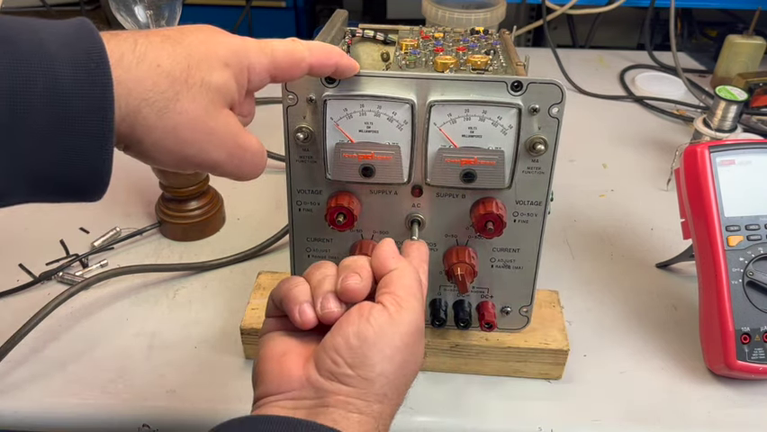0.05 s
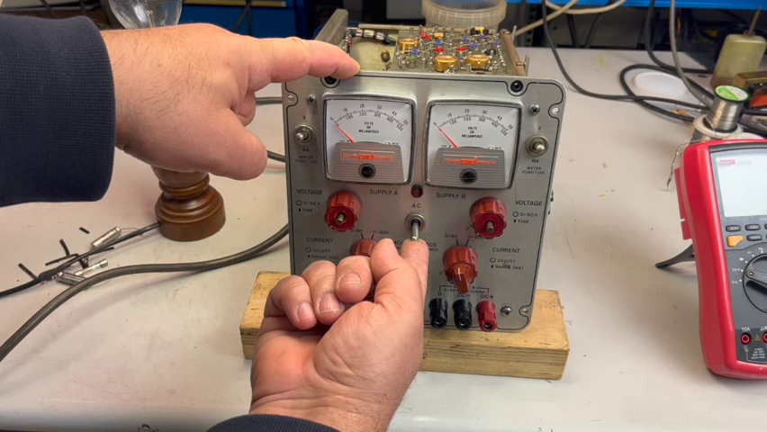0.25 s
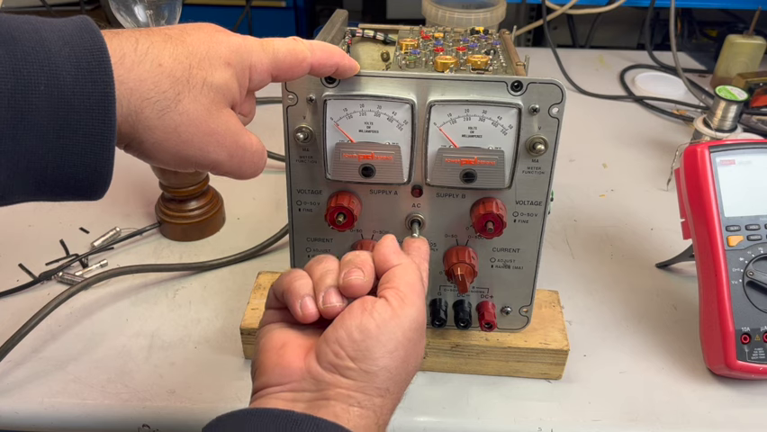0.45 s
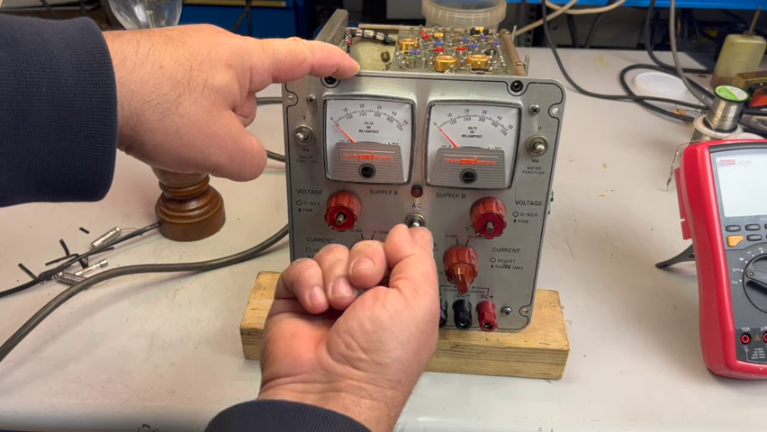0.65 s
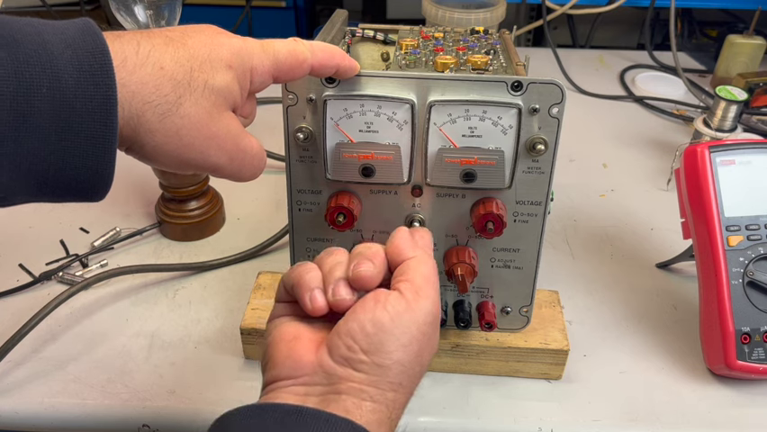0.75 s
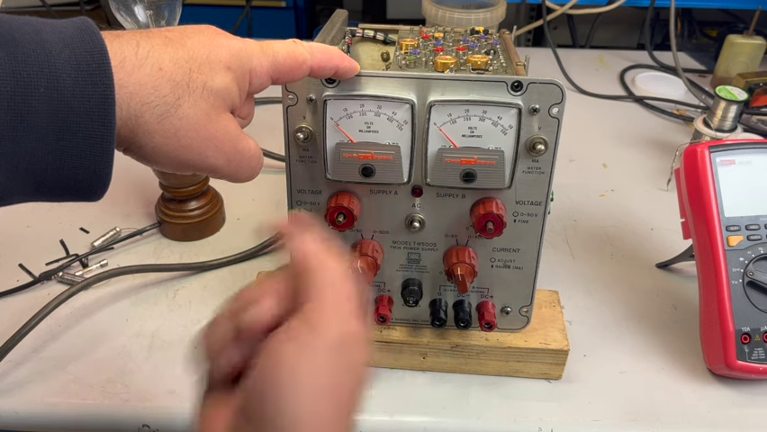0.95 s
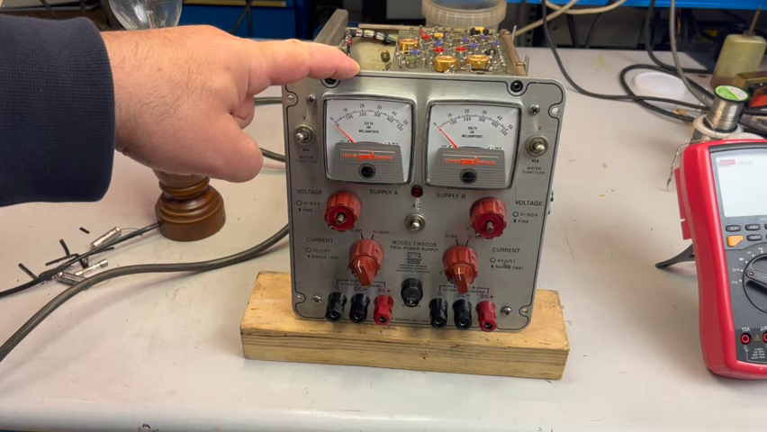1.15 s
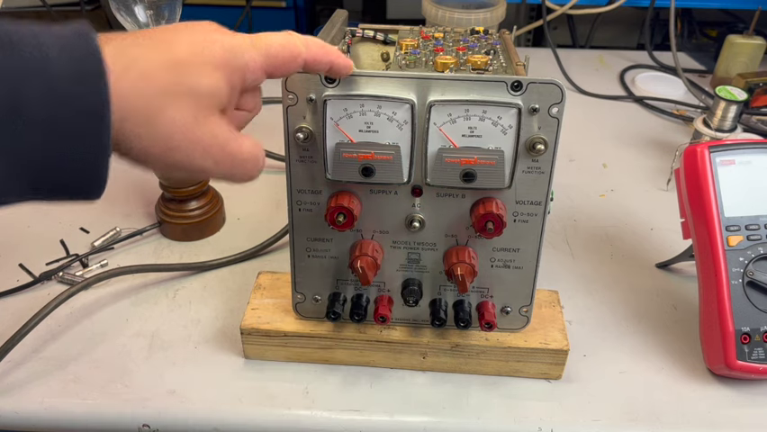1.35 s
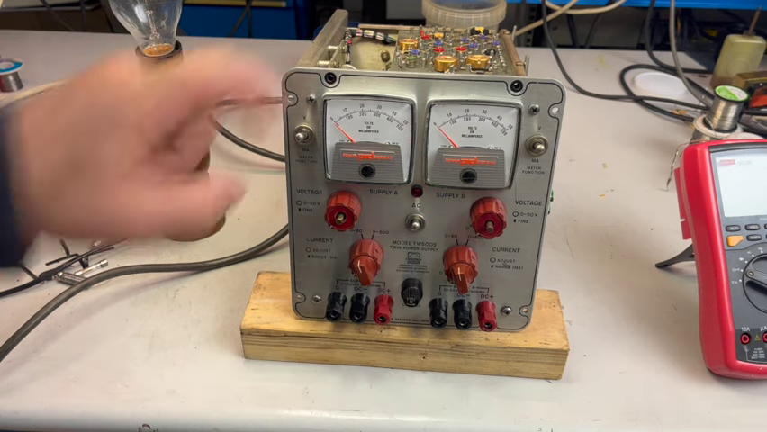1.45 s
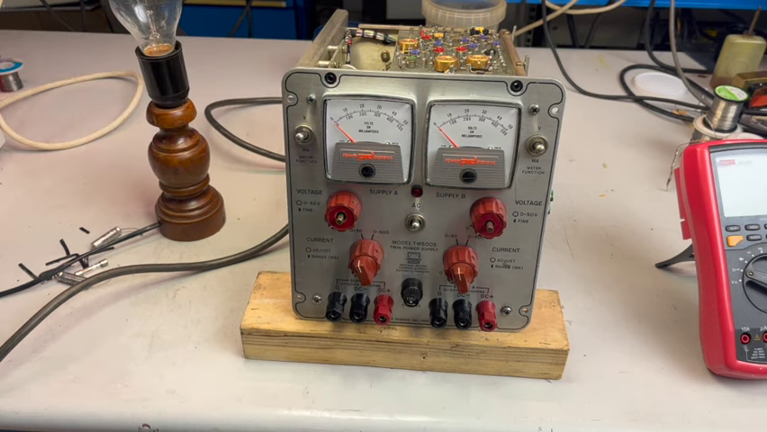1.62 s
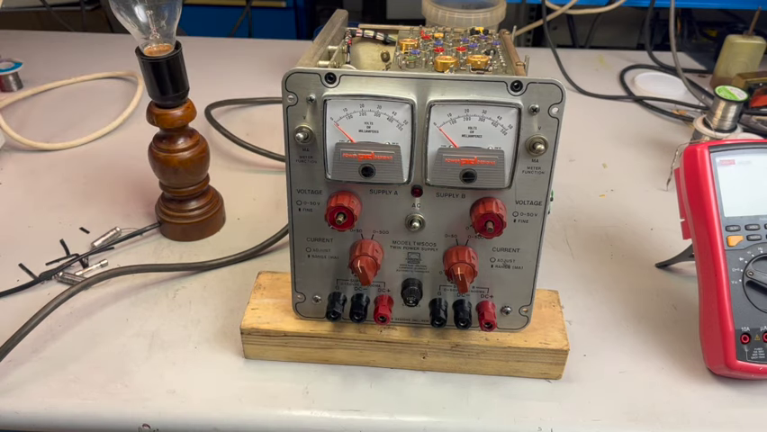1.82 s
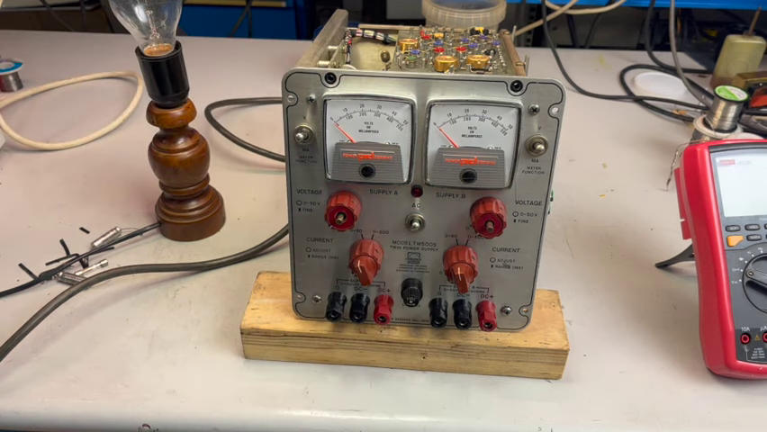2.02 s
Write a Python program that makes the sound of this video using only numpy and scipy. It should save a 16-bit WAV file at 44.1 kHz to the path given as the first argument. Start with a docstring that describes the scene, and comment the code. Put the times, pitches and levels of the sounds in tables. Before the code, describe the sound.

A toggle switch is flipped on a bench power supply, giving one sharp, close click with a brief metallic ring. Afterwards sleeves rustle very faintly and a hand brushes off the case, over a small workshop's low rumble.

```python
"""A small workshop, close to a bench power supply: a toggle switch is flipped on its metal front.
A fingertip ticks on the lever, the lever rubs, the spring snaps over and the contact hits its stop.
Each hit cracks and rings the panel and case; the room answers and the chassis shudders on its block.
Afterwards sleeves rustle faintly and a hand brushes off the case, over the low rumble of the room."""
import sys
import numpy as np
from scipy import signal
from scipy.fft import rfft, irfft, next_fast_len
from scipy.io import wavfile
from scipy.ndimage import uniform_filter1d, map_coordinates

SR = 44100
rng = np.random.default_rng(int(sys.argv[2]) if len(sys.argv) > 2 else 0)


def store_pcm(level_fs):
    """Save levels as 16-bit WAV."""
    pcm = np.round(np.clip(level_fs, -1, 1) * 32767).astype(np.int16)
    wavfile.write(sys.argv[1], SR, np.atleast_2d(pcm).T)


N = 91595
TIME = np.arange(N) / SR
FFT_SIZE = next_fast_len(N + 8192)
ATTACK_S = .0001


def amp(db):
    """Decibels to gain."""
    return 10 ** (np.asarray(db) / 20)


def unit(x):
    """Scale to rms 1."""
    return x / np.sqrt(np.mean(x ** 2) + 1e-20)


def along(curve, hz):
    """Read a breakpoint curve on a log frequency axis."""
    freqs, values = np.transpose(curve)
    return np.interp(np.log(hz + 1), np.log(freqs + 1), values)


def filtered(x, response):
    """EQ x with a gain given as a function of frequency."""
    hz = np.fft.rfftfreq(FFT_SIZE, 1 / SR)
    return irfft(rfft(x, FFT_SIZE) * response(hz), FFT_SIZE)[..., :N]


def causal(gain):
    """Minimum-phase EQ: no pre-ring ahead of a hit."""
    cepstrum = irfft(np.log(np.maximum(gain, 1e-6)))
    n = np.arange(len(cepstrum))
    return np.exp(rfft(cepstrum * np.where(n == 0, 1, 2 * (n < len(n) // 2))))


def since(start):
    """Seconds since start, zero before."""
    return np.maximum(TIME - start, 0)


def fade(t, t60, rise):
    """Attack and exponential decay."""
    return (1 - np.exp(-t / rise)) * np.exp(-np.log(1000) * t / t60)


def tilt(hz, slope_db):
    """Tilt EQ in dB per octave around 3 kHz, flat below 1 kHz."""
    return amp(slope_db * np.log2(np.maximum(hz, 1000) / 3000))


def noise(spectrum, correlation, slope_db=0):
    """Coloured stereo noise of rms 1; high left-right correlation narrows the image."""
    def colour(hz):
        width = np.arccos(np.clip(along(correlation, hz), -1, 1)) / 2
        return amp(along(spectrum, hz)) * tilt(hz, slope_db) * [np.cos(width), np.sin(width)]
    mid, side = filtered(rng.standard_normal((2, N)), colour)
    return unit(np.array([mid + side, mid - side]))


def ring(modes, t, slope_db=0, spread_rad=.35):
    """Damped modes, each a little out of phase between left and right."""
    phases = spread_rad * rng.standard_normal((len(modes), 2, 1))
    return sum(amp(db) * tilt(hz, slope_db) * fade(t, t60, ATTACK_S) * np.sin(2 * np.pi * hz * t + phase)
               for (hz, db, t60), phase in zip(modes, phases))


# Room tone colour: (frequency [Hz], relative level [dB])
RUMBLE_EQ = [(20, -32), (33, -23), (44, 1), (58, -12), (82, -0.5), (122, -12), (160, -7.5), (250, -9),
             (390, -12.5), (520, -23.5), (1100, -24), (1500, -25.5), (2300, -36.5), (4000, -48),
             (7000, -55.5), (8300, -62), (9000, -44), (9600, -56.5), (12500, -53.5), (15000, -65)]
# Stereo image of room tone and shudder: (frequency [Hz], left-right correlation [-1..1])
RUMBLE_IMAGE = [(40, 0.97), (125, 0.986), (250, 0.78), (500, 0.13), (1500, .55), (10000, 0.42)]

def room_tone(level_db=-55.5, sway_db=.85, sway_rate_hz=5, left_lag_s=.0002):
    """The workshop's low, gently swaying bed, a touch later and louder on the left."""
    sway = map_coordinates(rng.standard_normal(64), [TIME * sway_rate_hz], mode="mirror")
    rumble = noise(RUMBLE_EQ, RUMBLE_IMAGE)
    rumble = filtered(rumble, lambda hz: np.exp(1j * np.pi * left_lag_s * np.outer([-1, 1], hz)))
    return amp(level_db + sway_db * sway) * rumble * amp([[.35], [-.35]])


# Sleeve moves: (peak time [s], half-length [s], level [dB], tilt [dB/octave])
SLEEVE_MOVES = [(0.99, 0.073, -74, -7), (1.12, .075, -77, 0), (1.65, .24, -83, 4)]
# Cloth colour: (frequency [Hz], relative level [dB])
CLOTH_EQ = [(300, -17), (1200, 0.5), (2500, 4.5), (4500, -8.5), (7000, -10.5), (8300, -31), (9500, -7.5),
            (12500, -1), (14000, -10.5), (15000, -27)]

def sleeves():
    """Cloth rubs in soft swells as the arms draw back."""
    return sum(amp(db) * np.exp(-((TIME - peak) / half) ** 2 / 2) * noise(CLOTH_EQ, [(1000, .33)], slope)
               for peak, half, db, slope in SLEEVE_MOVES)


# Colour of a hand on the case: (frequency [Hz], relative level [dB])
BRUSH_EQ = [(400, -15), (1500, -2.5), (2400, 2.5), (3200, -2), (5000, -6.5), (7000, -8), (8300, -40),
            (9600, -9), (12500, -8.5), (14000, -15), (15000, -28)]

def hand_brush(peak_s=1.355, half_length_s=.05, level_db=-69):
    """The resting hand slips off the top of the case."""
    swell = np.exp(-((TIME - peak_s) / half_length_s) ** 2 / 2)
    return amp(level_db) * swell * noise(BRUSH_EQ, [(1000, .47)])


# Hollow chassis knock: (frequency [Hz], level [dB], t60 [s])
KNOCK_MODES = [(170, -50, .18), (380, -50, .09), (580, -50, .08)]
# Low-end shudder: (frequency [Hz], relative level [dB])
SHUDDER_EQ = [(40, -29.5), (72, -1), (104, -4), (135, -20.5), (400, -43), (2000, -87)]

def chassis(shudder_db=-49.5):
    """On the last hit the heavy chassis knocks and shakes on its wooden block."""
    t = since(SWITCH_HITS[-1][0])
    knock = ring(KNOCK_MODES, t, spread_rad=.6)
    shudder = amp(shudder_db) * fade(t, t60=.79, rise=.056) * noise(SHUDDER_EQ, RUMBLE_IMAGE)
    return knock + shudder


# Fingertip tick: (frequency [Hz], level [dB], t60 [s])
FINGER_MODES = [(2810, -73, .015), (4050, -65, .025), (4900, -72, .015)]
# Pivot giving way: (frequency [Hz], level [dB], t60 [s])
PIVOT_MODES = [(1220, -51, .065), (1780, -52, .05), (2330, -57, .04)]
# Lever friction colour: (frequency [Hz], relative level [dB])
RUB_EQ = [(500, -21), (950, -10), (1220, 3.5), (1450, -6.5), (1750, 1), (2400, -12), (6000, -15.5),
          (12000, -23.5)]
# Stereo image of rub and crack: (frequency [Hz], left-right correlation [-1..1])
SWITCH_IMAGE = [(300, 1), (1500, 0.82), (4000, 0.5505), (7000, 0.13), (12000, .65)]

def lever(touch_s=.1185, scuff_db=-58, peak_db=-50, build_db_per_s=1100):
    """A fingertip lands; the lever gives way with a scuff and rubs ever harder up to the snap."""
    give_s, snap_s = SWITCH_HITS[0][0], SWITCH_HITS[1][0]
    tick = ring(FINGER_MODES, since(touch_s))
    pivot = ring(PIVOT_MODES, since(give_s))
    scuff = amp(scuff_db) * fade(since(give_s), t60=.14, rise=.0011)
    build = amp(peak_db - build_db_per_s * np.abs(snap_s - TIME))
    rub = (scuff + build) * (TIME < snap_s) * noise(RUB_EQ, SWITCH_IMAGE)
    return tick + pivot + rub


# Reverb colour: (frequency [Hz], relative level [dB])
TAIL_EQ = [(150, -12), (550, -4), (720, -10.5), (950, 7), (1400, -2.5), (3200, -3.5), (4150, -1),
           (4520, 6.5), (4850, -0.5), (6200, -5.5), (7400, -8.5), (8400, -24), (9800, -8.5), (12400, -6),
           (13800, -14), (14800, -31.5)]
# Reverb decay: (frequency [Hz], t60 [s])
TAIL_DECAY = [(300, .35), (2000, .31), (5000, 0.28), (12000, 0.22)]

def room_tail(t, send_db=-34.5, rise_s=.0057):
    """The room's diffuse answer to one hit; the treble dies first."""
    wash = noise(TAIL_EQ, correlation=[(100, .8), (600, -.1), (2000, .15), (10000, .15)])
    hz, _, bands = signal.stft(wash, SR, nperseg=256)
    age = t[np.minimum(np.arange(bands.shape[-1]) * 128, N - 1)]
    decay = np.exp(-np.log(1000) * age / along(TAIL_DECAY, hz)[:, None])
    tail = signal.istft(bands * decay, SR, nperseg=256)[1][:, :N]
    return amp(send_db) * (1 - np.exp(-t / rise_s)) * tail


# Short ping of switch and front panel: (frequency [Hz], relative level [dB], t60 [s])
PANEL_MODES = [(1003, -29.5, .07), (1085, -34, .06), (1375, -28, .035), (1690, -22, .018),
               (1850, -22.5, .024), (2355, -25.5, .032), (2840, -20.5, .026), (3311, -23.5, .035),
               (3945, -26, .032), (4817, -24, .028), (5670, -21.5, .026), (6080, -19, .014),
               (11970, -22.5, .015), (12500, -27.5, .018)]
# Long, faint ring of the sheet-metal case: (frequency [Hz], relative level [dB], t60 [s])
CASE_MODES = [(921, -48, .28), (1002, -46, .28), (3305, -51, .23), (4131, -48, .22), (4440, -48, .22),
              (4540, -43, .22)]

def metal_ring(t, slope_db, panel_db, case_db, low_cut_hz=990):
    """Panel and case ring after a hit; small metal sheets radiate little bass."""
    panel = amp(panel_db) * ring(PANEL_MODES, t, slope_db)
    case = amp(case_db) * ring(CASE_MODES, t, spread_rad=.8)
    low_cut = signal.butter(4, low_cut_hz, "high", fs=SR, output="sos")
    return signal.sosfilt(low_cut, panel + case)


# Dry contact transient: (frequency [Hz], relative level [dB])
CRACK_EQ = [(100, -25.5), (400, -12.5), (760, -12.5), (1000, -2), (2000, 1), (3500, -0.5), (6000, 1),
            (7500, -2.5), (8400, -19), (9300, -8), (10900, -5.5), (12200, -2), (13700, -6.5), (15200, -22)]

def crack(envelope, correlation, slope_db, smooth_bins=2400):
    """The crack of a contact: a noise burst, flattened across frequency and then coloured."""
    burst = envelope * noise([(1000, 0)], correlation)
    power = np.mean(np.abs(rfft(burst, FFT_SIZE)) ** 2, axis=0)
    flatten = np.sqrt(power.mean() / np.abs(uniform_filter1d(power, smooth_bins)))
    colour = lambda hz: unit(amp(along(CRACK_EQ, hz)) * tilt(hz, slope_db))
    return filtered(burst, lambda hz: causal(colour(hz) * flatten))


# Lever tick, spring snap, end stop:
# (time [s], gain [dB], tilt [dB/octave], panel gain [dB], case gain [dB])
SWITCH_HITS = [(0.4479, -33, 1.5, -10, -3), (0.4927, 0.5, 2.3, -2, -15.5), (0.4949, -0.5, -5, -5.5, 0)]
# Pan of the click: (frequency [Hz], left over right [dB])
SWITCH_PAN = [(300, 5.5), (600, 2.5), (1000, 0), (2800, 0), (5000, 4), (6500, 3), (8000, 0.5),
              (12000, -0.5)]

def switch(crack_db=-13.5, bench_db=-28, bench_delay_s=.0025):
    """Each hit inside the switch cracks, rings the metal and scatters off the bench into the room."""
    bench_image = [(500, .081), (2000, .86), (6000, .2)]
    click = np.zeros((2, N))
    for start, db, slope_db, panel_db, case_db in SWITCH_HITS:
        t = since(start)
        direct = amp(crack_db) * crack(fade(t, t60=.008, rise=ATTACK_S), SWITCH_IMAGE, slope_db)
        metal = metal_ring(t, slope_db, panel_db, case_db)
        scatter = fade(since(start + bench_delay_s), t60=.05, rise=.001)
        bench = amp(bench_db) * crack(scatter, bench_image, slope_db)
        click += amp(db) * (direct + metal + bench + room_tail(t))
    return filtered(click, lambda hz: amp(np.outer([.5, -.5], along(SWITCH_PAN, hz))))


def scene():
    """The click up front, with faint hand and cloth foley over the room tone."""
    return lever() + switch() + chassis() + sleeves() + hand_brush() + room_tone()


def record(dry):
    """A brick-wall high cut on the whole mix."""
    high_cut_hz = 15100
    return filtered(dry, lambda hz: causal(1 / np.sqrt(1 + (hz / high_cut_hz) ** 160)))


dry = scene()
out = record(dry)
store_pcm(out)
```